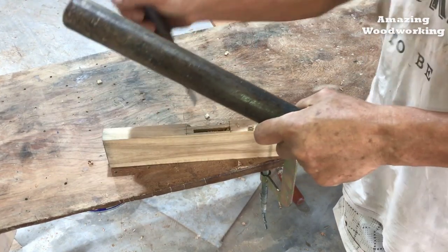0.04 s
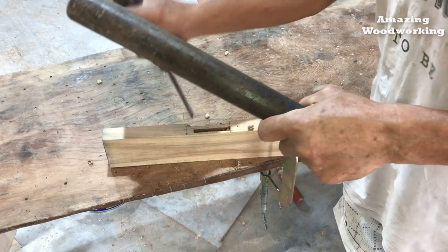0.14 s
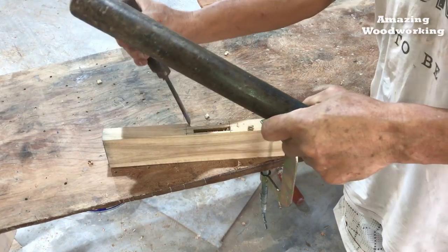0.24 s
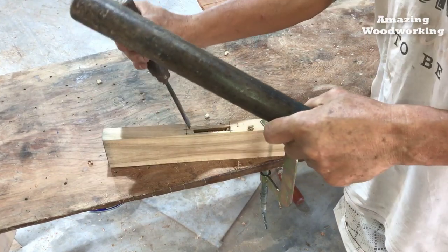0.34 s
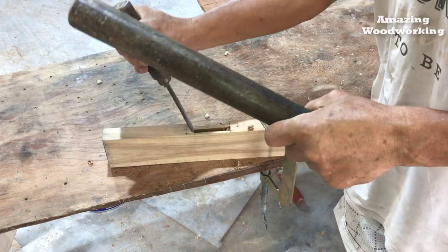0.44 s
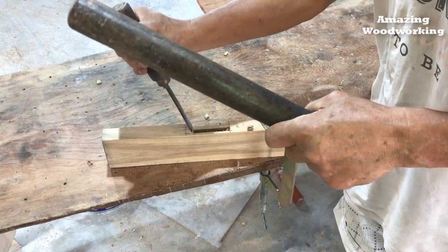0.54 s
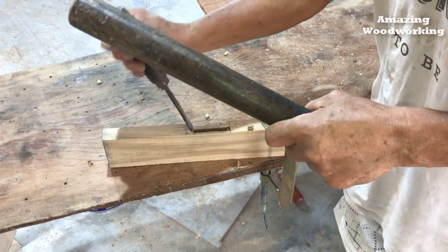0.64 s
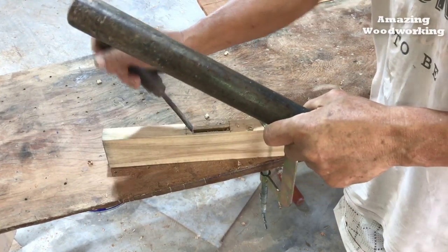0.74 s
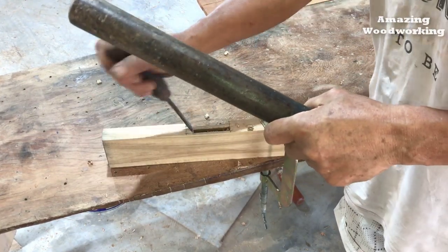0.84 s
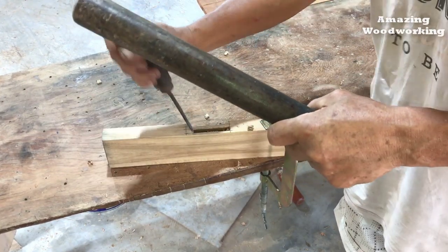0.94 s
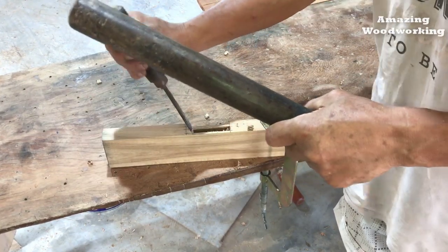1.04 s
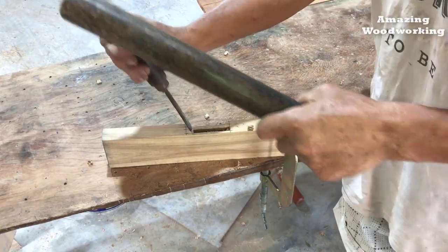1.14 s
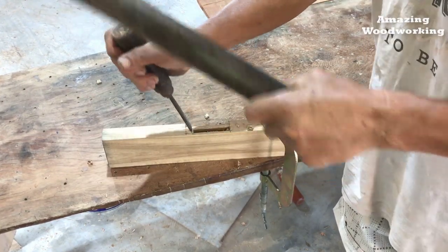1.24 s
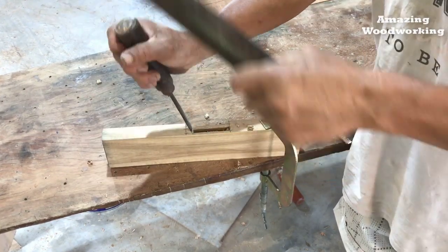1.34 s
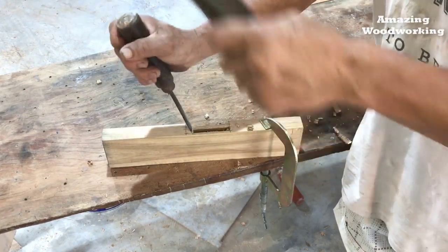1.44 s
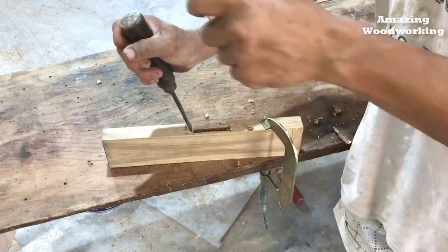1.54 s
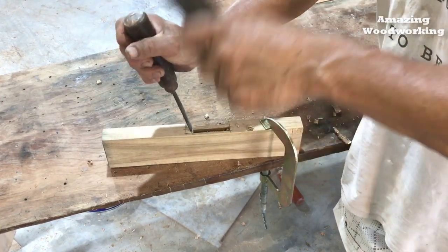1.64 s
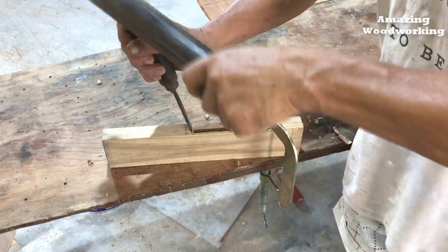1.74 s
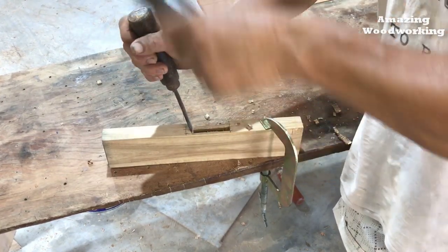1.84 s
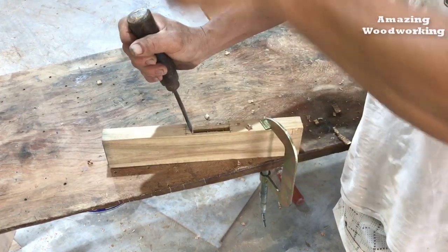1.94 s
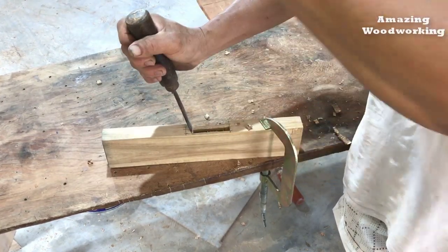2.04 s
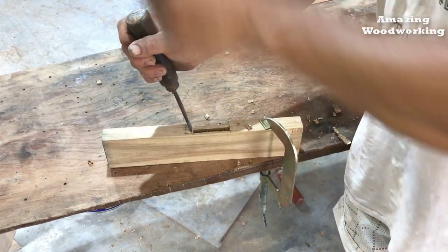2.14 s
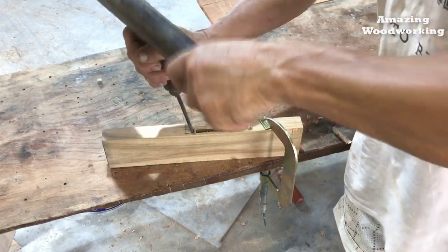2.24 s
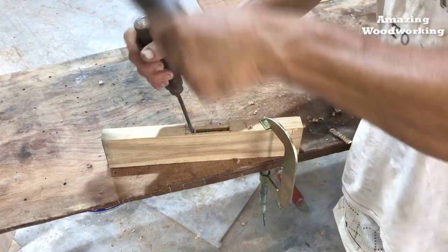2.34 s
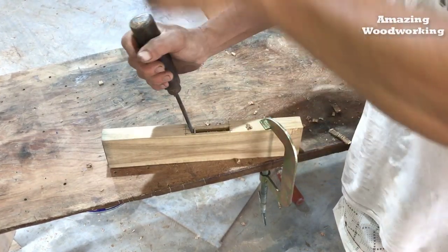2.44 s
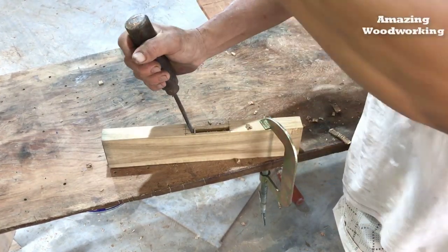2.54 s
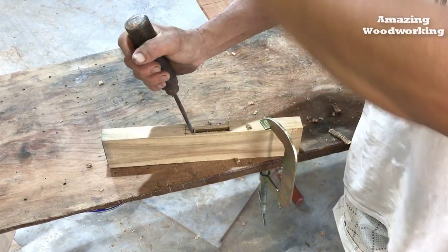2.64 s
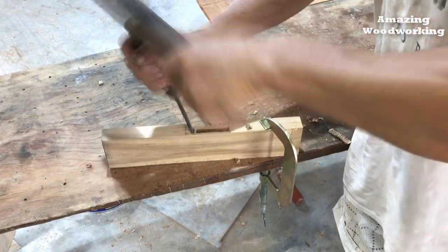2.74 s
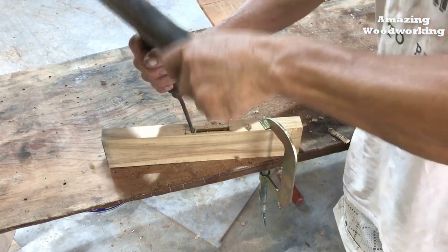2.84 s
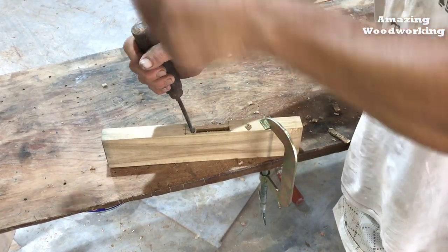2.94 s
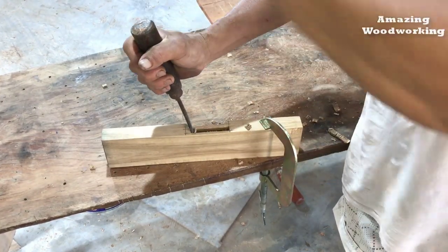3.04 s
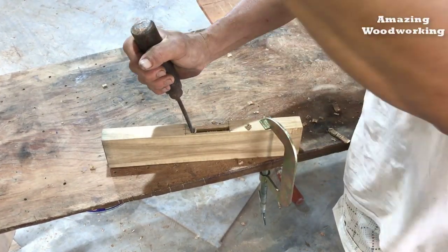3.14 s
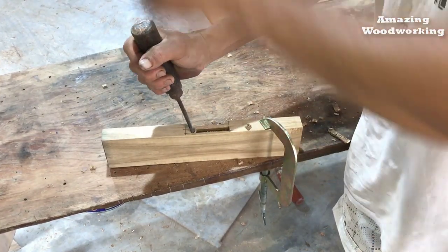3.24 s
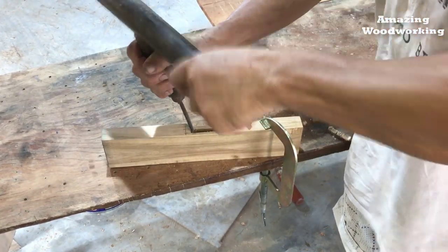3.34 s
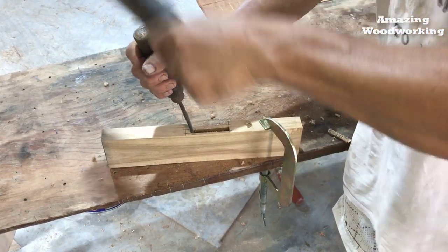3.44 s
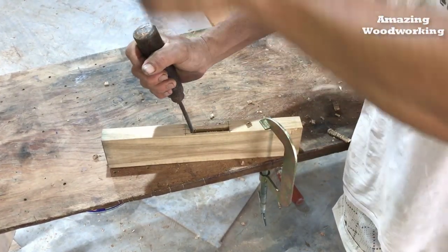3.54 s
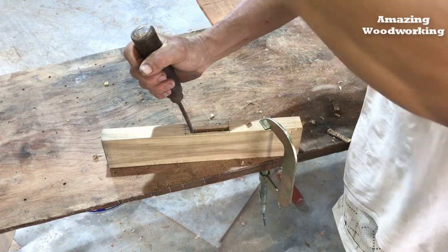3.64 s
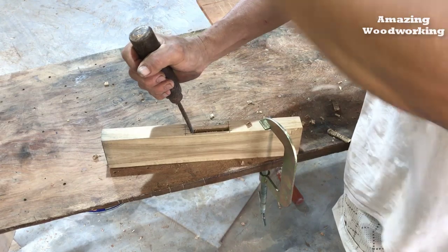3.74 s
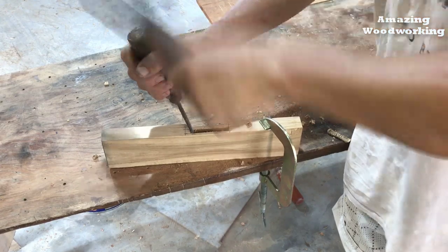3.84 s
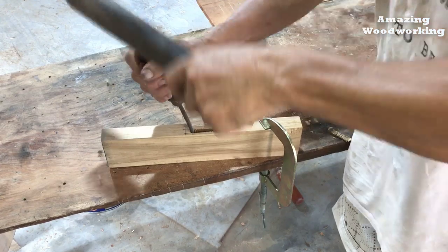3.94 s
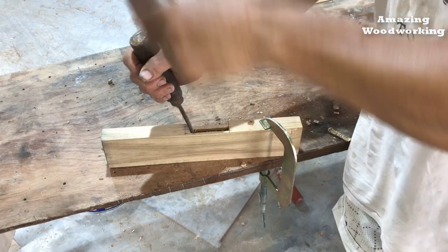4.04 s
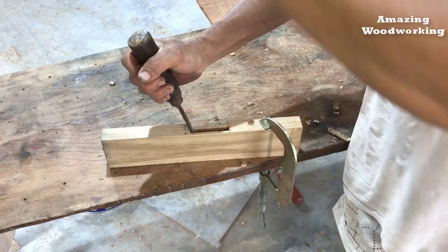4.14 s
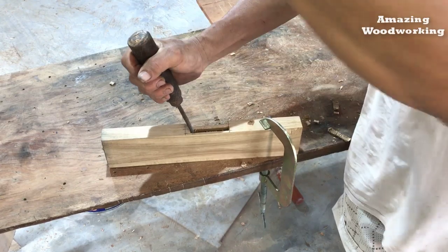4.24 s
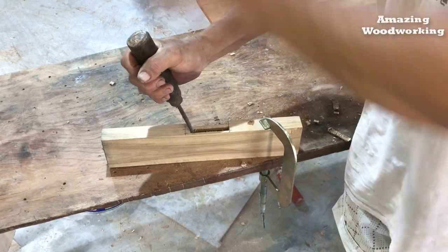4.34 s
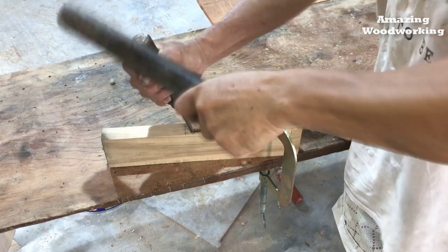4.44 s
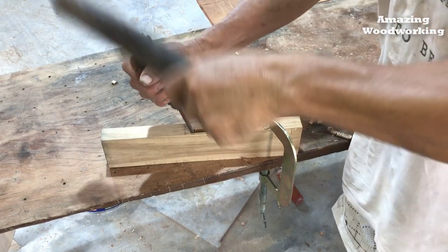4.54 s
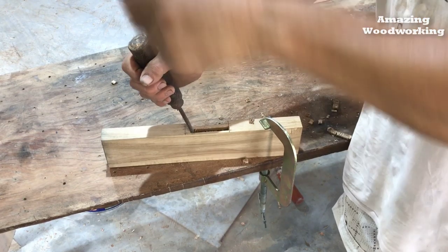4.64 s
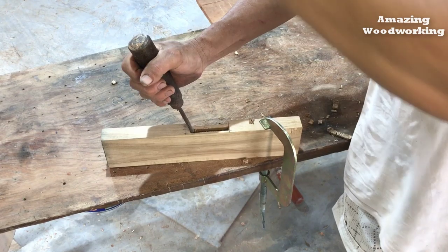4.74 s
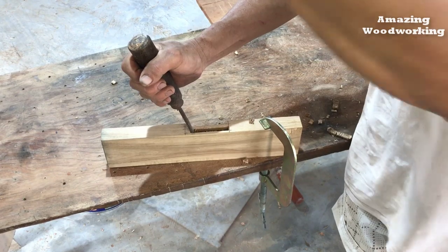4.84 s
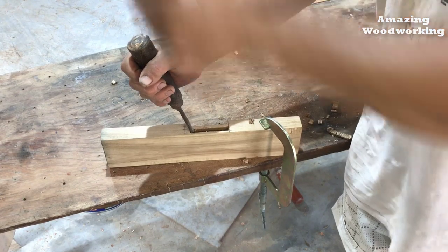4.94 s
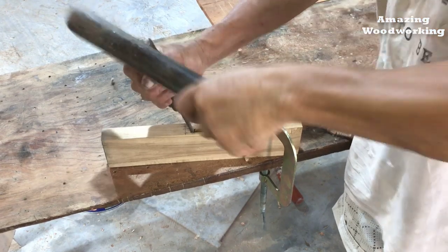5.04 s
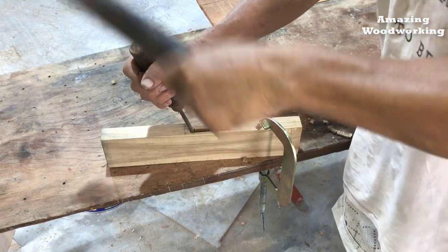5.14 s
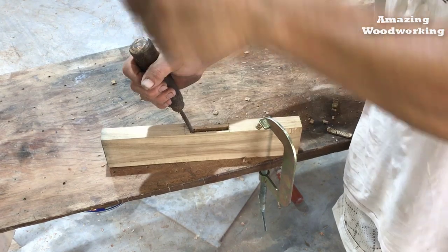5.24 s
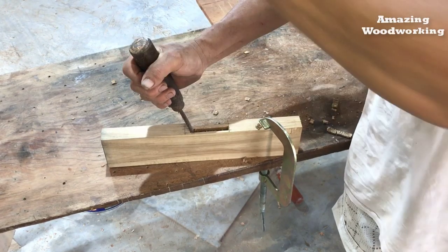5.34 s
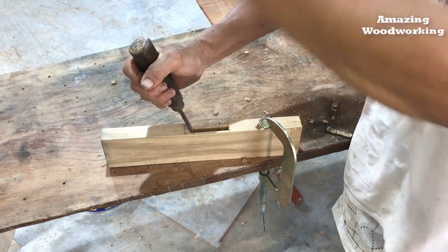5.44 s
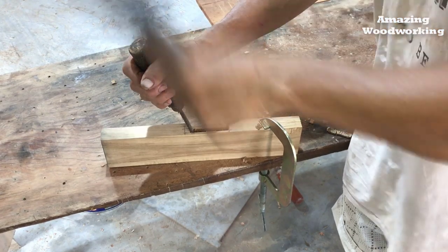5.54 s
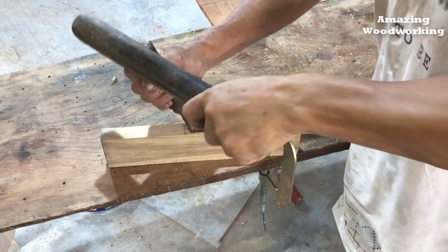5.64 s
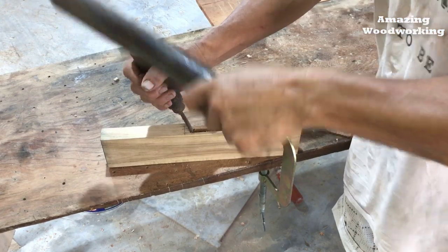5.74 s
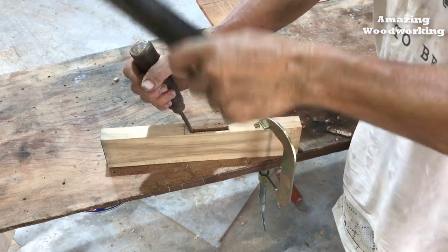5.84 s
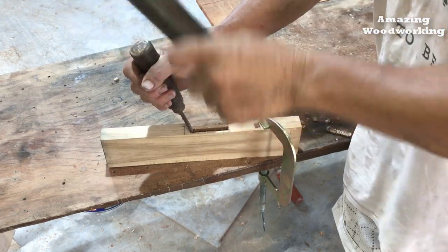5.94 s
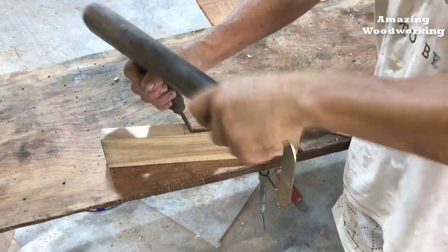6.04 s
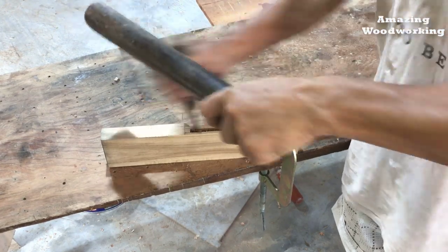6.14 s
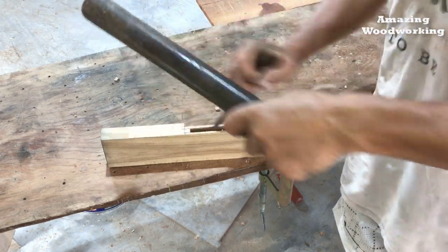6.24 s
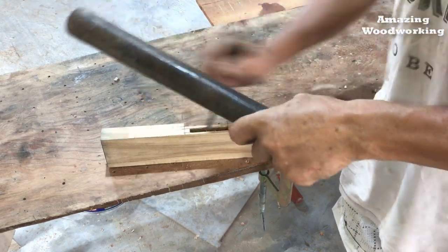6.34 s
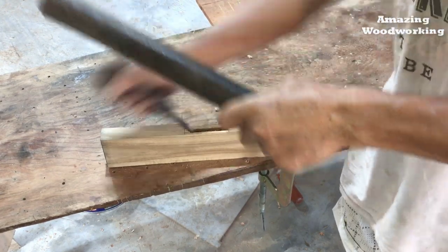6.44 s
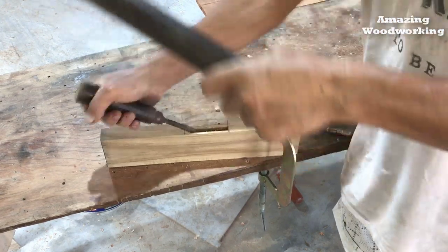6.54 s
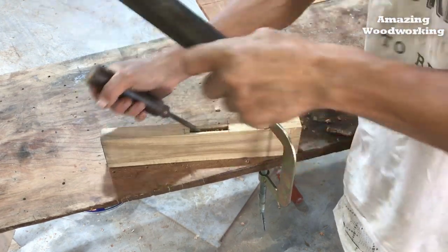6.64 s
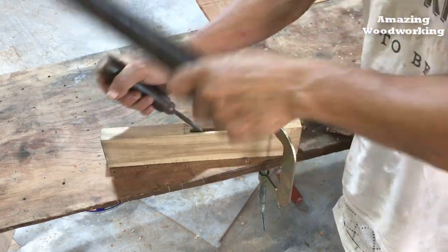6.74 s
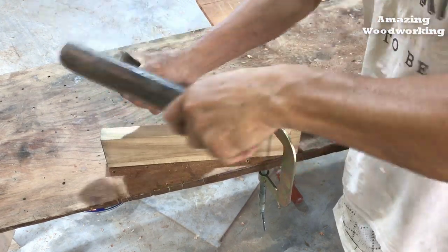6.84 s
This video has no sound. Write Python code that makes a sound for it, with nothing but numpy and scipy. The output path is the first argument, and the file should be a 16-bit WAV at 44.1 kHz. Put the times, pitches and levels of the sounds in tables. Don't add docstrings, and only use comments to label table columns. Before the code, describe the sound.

A metal pipe drives a chisel into clamped wood in evenly spaced, loud, woody cracks, with bench thuds and roomy echo over insect drone.

```python
import sys
import numpy as np
from scipy import signal
from scipy.io import wavfile
from scipy.ndimage import uniform_filter1d

SR = 44100
rng = np.random.default_rng(int(sys.argv[2]) if len(sys.argv) > 2 else 0)


def unload_wav(signal):
    wavfile.write(
        sys.argv[1],
        SR,
        np.round(np.clip(np.atleast_2d(signal).T, -1, 1) * 32767).astype(np.int16),
    )


def nominal_scale(level):
    x = np.asarray(level, float) / 20
    return 10 ** x


N = 304272

# frequency_hz, density_db [dB per Hz]
AIR_SPECTRUM = [(20, -6), (50, 7.5), (90, -12), (300, -21.5), (1000, -34.5), (2300, -41), (4000, -35.5),
                (6000, -37.5), (8000, -48), (10500, -39.5), (13000, -49.5), (16000, -52.5)]
# centre_hz, width_hz, level_db
INSECT_DRONES = [(1650, 530, -62.5), (3235, 570, -59), (4552, 185, -55)]
# start_s, tick_level_db, wood_share_db, centre_hz, width_octaves
LIGHT_KNOCKS = [
    (0.01, -54, 6.5, 1092, 0.072),
    (0.238, -35.5, -31, 1940, 3.7),
    (.447, -58, -44, 13500, 0.8),
    (.665, -37.5, 3.5, 1130, 2.6),
    (1.084, -53, -11, 450, 0.51),
    (1.225, -51, -40, 6540, .5),
    (6.459, -20.5, -9, 3220, 0.88),
]
# start_s, length_s, level_db, centre_hz, width_octaves
CHISEL_RUBS = [(.33, 0.16, -56.5, 850, 2), (1.08, 0.2, -59, 352, 1.4), (1.396, .2, -57, 280, 0.58),
               (0.298, 0.26, -74, 13000, .12), (0.83, 0.051, -69, 11110, 1.3),
               (1.13, 0.093, -66.5, 7100, 1.9), (1.465, 0.058, -62, 12600, 2.9),
               (5.44, 0.12, -54, 323, 0.71), (6.455, 0.091, -33.5, 1140, 3.5),
               (6.45, 0.05, -38.5, 11900, 1), (6.455, 0.068, -34, 252, 1.2)]
# frequency_hz, level_db, t60_s
BENCH_MODES = [(46.2, -6, 0.089), (124.4, 0.5, 0.15), (175.2, -6.5, 0.19), (211.7, 2.5, 0.088),
               (304.5, -10.5, 0.23), (407.4, -12.5, 0.13), (665, -38, 0.3)]
# multiple of its pitch [ratio], level_db, t60_s
TIMBER_MODES = [(.92, -21.5, 0.011), (1.001, 1.5, 0.024), (1.09, -6.5, 0.013), (1.2, -10, 0.012),
                (1.6, -5, 0.037)]
# frequency_hz, t60_s
SHED_DECAY = [(100, 0.55), (400, 0.53), (1200, 0.5), (3000, 0.48), (7000, 0.54), (15000, 0.39)]
# start_s, length_s, pitch_hz, level_db
FOWL_CALLS = [(.095, .16, 602, -55.5)]
# start_s, length_s, pitch_hz, level_db
BENCH_GROANS = [(1.07, .27, 326, -62.5), (1.4, .23, 313.5, -67)]
# start_s, force_db, timber_share_db, timber_pitch_hz, off_centre_db (on the pipe)
BLOW_EVENTS = [
    (1.723, 0, -3, 1253, 27),
    (2.215, -0.5, -2, 1274, -3),
    (2.764, -3.5, 1, 1460, -8),
    (3.321, -1.5, -2, 1482, -4),
    (3.873, -1.5, -0.5, 1524, 0.5),
    (4.434, -0.5, 1, 1344, -1),
    (5.013, -.5, -2.5, 1320, 4),
    (5.587, -.5, -3, 1313, 1.5),
    (6.058, 2, -2, 1615, 19.5),
    (6.821, -12, 7, 1247, 2),
]
# frequency_hz, density_db [dB per Hz]
CRACK_SPECTRUM = [(300, -1.5), (500, -14), (800, -8.5), (1050, -20.5), (1400, -7.5), (2000, -10),
                  (3000, -15), (4200, -21), (6000, -21.5), (7500, -28.5), (10300, -26), (12500, -31.5),
                  (14800, -17.5), (16500, -27)]
# frequency_hz, level_db, t60_s
HANDLE_MODES = [(2634, -13.5, 0.037), (2782, -11, 0.022), (2869, -4.5, 0.058), (2940, -6.5, 0.059),
                (2925, -9.5, 0.043), (2985, -8.5, 0.032), (3068, -7, .04), (3460, -1.5, 0.013)]
# frequency_hz, level_db, t60_s
BLADE_MODES = [(6030, -28, .07), (6115, -27, .12), (6235, -26, .09), (6430, -30, .07)]
# frequency_hz, level_db, t60_s
LEG_MODES = [(119.5, -36, 1.6), (123, -36, 1.6), (176, -19, .7)]
# frequency_hz, level_db, t60_s
PIPE_MODES = [(8045, -6, .4), (8694, -2, .14), (14690, -3, .17)]
# level at centre_db, slope [dB per dB]
PIPE_OFF_CENTRE = [(-51, 1.3), (-28, .6), (-17, .35)]
# frequency_hz, level_db
STEEL_PART_MODES = [(7370, -62), (9340, -70), (9577, -74), (12344, -76), (13701, -74)]
# start_s, level_db
STEEL_PART_TOUCHES = [(4.801, 2.5), (4.848, -0.5)]

BENCH_FOLLOWS, TOOL_FOLLOWS, TREBLE_FOLLOWS = 1.3, 0.8, 0.6


def unit(x):
    return x / np.sqrt(np.mean(x ** 2) + 1e-20)


def at_hz(points, hz):
    frequency, value = np.array(points)[:, 0], np.array(points)[:, 1]
    return np.interp(np.log(hz), np.log(frequency), value)


def add(out, start_s, sound):
    i = int(start_s * SR)
    out[i:i + len(sound)] += sound[:N - i]


def band_pass(x, low_hz, high_hz, order):
    return signal.sosfilt(signal.butter(order, [low_hz, high_hz], "band", fs=SR, output="sos"), x)


def around(x, hz, octaves):
    low, high = np.clip(hz * 2 ** (np.array([-0.5, 0.5]) * octaves), 20, 0.45 * SR)
    return band_pass(band_pass(x, low, high, 1), low, high, 1)


def bands(shape, low_hz):
    white = rng.standard_normal((2, *shape))
    edges = low_hz * 2 ** np.arange(0, np.log2(18000 / low_hz), 1 / 3)
    slices = []
    for k, (low, high) in enumerate(zip(edges, edges[1:])):
        slices.append((np.sqrt(low * high), band_pass(white[k % 2], low, high, 2)))
    return slices


def drift(rate_hz):
    r = np.exp(-2 * np.pi * rate_hz / SR)
    wander = signal.lfilter([1], [1, -2 * r, r * r], rng.standard_normal(N + SR))
    return unit(wander[SR:])


def body(modes, times, db, pitch=1):
    hz, mode_db, t60 = np.transpose(modes)[:, :, None]
    out = np.zeros(N)
    t = np.arange(int(SR * min(t60.max(), 0.6))) / SR
    contact = 1 - np.exp(-t / 0.0004)
    luck_db = 1.5 * rng.standard_normal((len(times), len(modes), 1))
    for start_s, hit_db, scale, own_db in zip(times, db, pitch * np.ones(len(times)), luck_db):
        envelope = nominal_scale(hit_db + mode_db + own_db - 60 * t / t60)
        rings = envelope * np.sin(2 * np.pi * hz * scale * t)
        add(out, start_s, rings.sum(axis=0) * contact)
    return out


def outdoors():
    gust_db = 0.28 * drift(8.7)
    air = 0
    for hz, part in bands((N,), low_hz=20.1):
        air = air + part * nominal_scale(at_hz(AIR_SPECTRUM, hz) + gust_db * (hz < 100))
    out = nominal_scale(-43.5) * unit(air)
    for hz, width, db in INSECT_DRONES:
        drone = band_pass(rng.standard_normal(N), hz - width / 2, hz + width / 2, 2)
        out += nominal_scale(db + 0.5 * drift(20)) * unit(drone)
    return out


def knocks():
    start_s, db, wood_db, timber_hz = np.transpose(LIGHT_KNOCKS)[:4]
    out = body(BENCH_MODES[1:], start_s, db + wood_db - 3.5)
    out += body(TIMBER_MODES, start_s, db + wood_db, timber_hz)
    t = np.arange(SR // 10) / SR
    for when, level_db, _, hz, octaves in LIGHT_KNOCKS:
        tick = around(rng.standard_normal(len(t)) * np.exp(-t / 0.0036), hz, octaves)
        add(out, when, nominal_scale(level_db) * tick / np.abs(tick).max())
    return out


def rubbing():
    out, count = np.zeros(N), SR // 10 * 3
    clumps = nominal_scale(2.5 * drift(90))
    for when, length, level_db, hz, octaves in CHISEL_RUBS:
        grains = rng.standard_normal(count) * nominal_scale(2.7 * rng.exponential(1, count))
        grains = grains * clumps[int(when * SR):][:count]
        phase = np.clip(np.arange(count) / SR / length, 0, 1)
        stroke = np.sin(np.pi * phase ** 0.34)
        add(out, when, nominal_scale(level_db) * unit(around(grains, hz, octaves)) * stroke)
    return out


def shed(x):
    t = np.arange(int(SR * 0.8)) / SR
    tail = 0
    for hz, part in bands(t.shape, low_hz=56.0):
        tail = tail + part * nominal_scale(-60 * t / at_hz(SHED_DECAY, hz))
    early = 1 + 1.38 / (1 + (t / 0.046) ** 3)
    tail = tail * (1 - np.exp(-t / 0.00067)) * early
    return signal.fftconvolve(x, tail / np.sqrt(np.sum(tail ** 2)))[:N]


def gliding(rows, shares, rough, sag, edge_s):
    out = np.zeros(N)
    shake = 1 + rough * drift(56)
    for start_s, length, hz, db in rows:
        t = np.arange(int(length * SR)) / SR
        turn = 2 * np.pi * hz * (t - sag * t ** 2 / (2 * length))
        tone = sum(a * np.sin((k + 1) * turn) for k, a in enumerate(shares))
        swell = np.clip(np.minimum(t, length - t) / edge_s, 0, 1) ** 2
        add(out, start_s, nominal_scale(db) * unit(tone) * swell)
    return out * shake


def fowl():
    return gliding(FOWL_CALLS, [0.9, 1.1, 0.5], rough=0.83, sag=0.032, edge_s=0.03)


def groans():
    return gliding(BENCH_GROANS, [1.1, 0.2, 0.25], rough=1.0, sag=0.129, edge_s=0.045)


def cracks():
    start_s, force = np.transpose(BLOW_EVENTS)[:2]
    tool_db, bright_db = TOOL_FOLLOWS * force, TREBLE_FOLLOWS * force
    t = np.arange(SR // 8) / SR
    tearing = nominal_scale(-8) * np.exp(-t / 0.018) * (1 - np.exp(-t / 0.0023))
    bursts = 0
    for hz, part in bands((len(start_s) + 1, len(t)), low_hz=302.5):
        sharp = np.clip(np.log2(hz / 3000), 0, 1)
        shape = np.exp(-t / (0.0018 + 0.0011 * sharp))
        shape = shape * (1 - 0.69 * sharp * np.exp(-(t / 0.0022) ** 2)) + tearing
        alike = 0.8 * part[0] + 0.6 * part[1:]
        level_db = at_hz(CRACK_SPECTRUM, hz) + tool_db + 29.5 + sharp * bright_db
        bursts = bursts + alike * nominal_scale(level_db)[:, None] * shape
    out = np.zeros(N)
    for when, burst in zip(start_s, bursts):
        add(out, when, burst)
    return out


def timber():
    start_s, force, share_db, pitch_hz, _ = np.transpose(BLOW_EVENTS)
    return body(TIMBER_MODES, start_s, TOOL_FOLLOWS * force + share_db + 2.66, pitch_hz)


def chisel():
    start_s, force, _, _, aside = np.transpose(BLOW_EVENTS)
    tool_db = TOOL_FOLLOWS * force
    handle = body(HANDLE_MODES, start_s, tool_db - 0.35 * aside + 11.3)
    return handle + body(BLADE_MODES, start_s + 0.0076, tool_db + TREBLE_FOLLOWS * force + 12)


def bench():
    start_s, force = np.transpose(BLOW_EVENTS)[:2]
    bench_db = BENCH_FOLLOWS * force
    out = body(BENCH_MODES, start_s + 0.003385, bench_db + 3.9)
    out += body(LEG_MODES[1:], start_s + 0.0034, bench_db + 2.2)
    return out - body(LEG_MODES[:1], start_s + 0.0032, bench_db + 1.25)


def pipe():
    start_s, force, _, _, aside = np.transpose(BLOW_EVENTS)
    centre_db, waking = np.transpose(PIPE_OFF_CENTRE)[:, :, None]
    level_db = centre_db + waking * aside[:, None, None] + force[:, None, None]
    return sum(body(PIPE_MODES, start_s + 0.012, level_db, detune) for detune in (0.9985, 1, 1.0012, 1.0031))


def tinkle():
    start_s, db = np.transpose(STEEL_PART_TOUCHES)
    return body([(hz, level_db, 0.6) for hz, level_db in STEEL_PART_MODES], start_s, db)


def scene():
    wood = timber()
    work = knocks() + rubbing() + cracks() + wood + chisel() + tinkle()
    near = bench() + pipe() + nominal_scale(4) * wood
    echo = nominal_scale(1.5) * shed(work + nominal_scale(-7) * near)
    return (outdoors() + work + near + echo + fowl() + groans())[None]


def ducking(x, threshold_db, share, attack_s, release_db_s, ahead_s):
    level = 10 * np.log10(uniform_filter1d(x ** 2, size=64) + 1e-12)
    t = np.arange(N) / SR
    climb = release_db_s * t
    held = np.maximum.accumulate(np.maximum(level - threshold_db, 0) + climb) - climb
    r = np.exp(-1 / (attack_s * SR))
    smooth = signal.lfilter([1 - r], [1, -r], held)
    return x * nominal_scale(-share * np.interp(t + ahead_s, t, smooth))


def top_cut(x):
    return signal.sosfilt(signal.butter(12, 16860, fs=SR, output="sos"), x)


def record(dry):
    x = signal.sosfilt(signal.butter(2, 32, "high", fs=SR, output="sos"), dry[0])
    x = ducking(x, threshold_db=-20.0, share=0.52, attack_s=0.044, release_db_s=60.0, ahead_s=-0.022)
    x = ducking(x, threshold_db=-7.5, share=0.92, attack_s=0.0012, release_db_s=229.5, ahead_s=0.0023)
    x = x / (1 + np.abs(x) ** 6) ** (1 / 6)
    x = signal.sosfilt(signal.cheby2(10, 30, 16400, fs=SR, output="sos"), x)
    return top_cut(x[None])


dry = scene()
out = record(dry)
unload_wav(out)
```